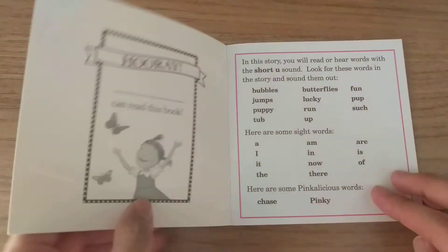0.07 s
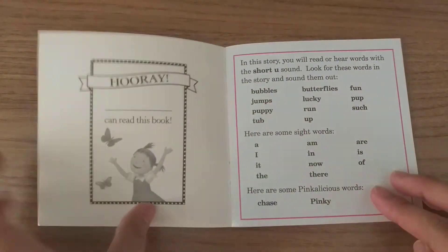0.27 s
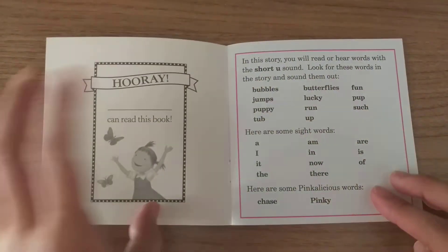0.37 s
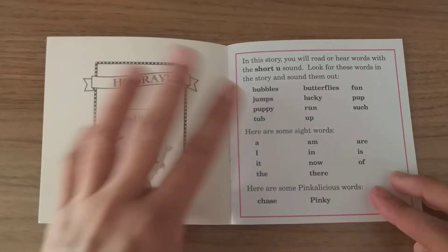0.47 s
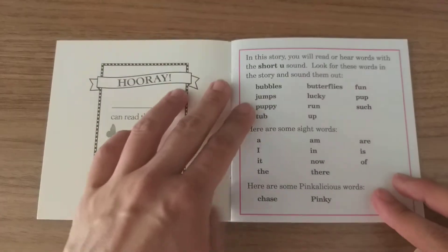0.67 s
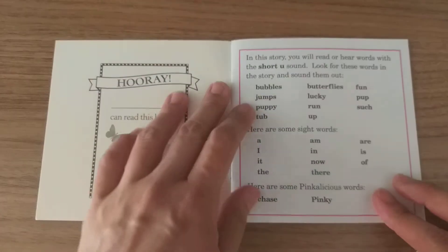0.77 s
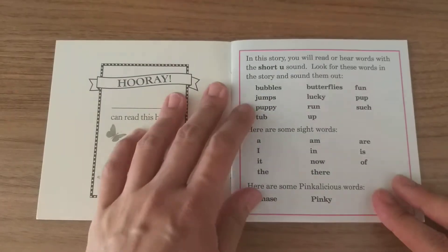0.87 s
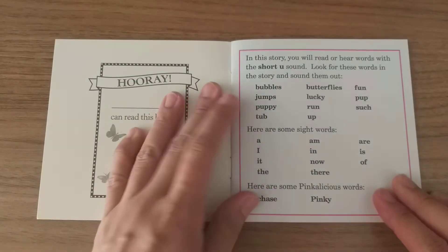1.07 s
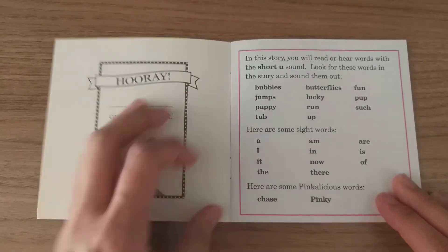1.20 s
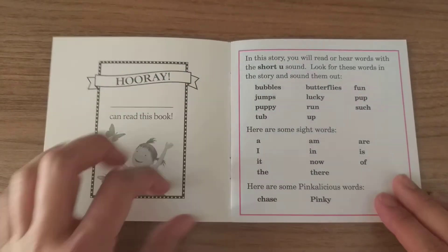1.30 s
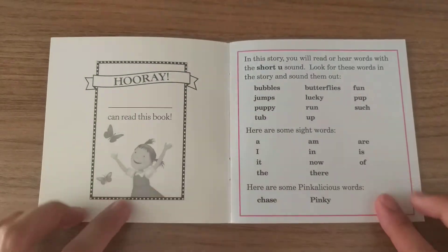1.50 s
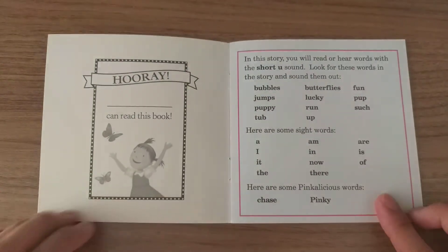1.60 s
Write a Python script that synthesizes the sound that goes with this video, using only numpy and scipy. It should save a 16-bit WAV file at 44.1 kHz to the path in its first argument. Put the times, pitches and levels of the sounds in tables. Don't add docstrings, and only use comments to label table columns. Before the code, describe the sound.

Close up in a quiet room, a card book cover buckles and snaps flat with a light thud, followed by a short papery rub, a quiet pause, small ticks and fading soft rustles as the hand lifts.

```python
import sys
import numpy as np
from scipy import signal
from scipy.fft import rfft, irfft
from scipy.io import wavfile

SR = 44100
rng = np.random.default_rng(int(sys.argv[2]) if len(sys.argv) > 2 else 0)


def decibels_to_gain(level_db):
    exponent = np.asarray(level_db, float) / 20
    return 10 ** exponent


def waveform_to_disk(signal):
    frames = np.transpose(np.atleast_2d(signal))
    scaled = np.clip(frames, -1, 1) * 32767
    samples = np.round(scaled).astype(np.int16)
    wavfile.write(sys.argv[1], SR, samples)


N = 72765
SPOTS = 3


def rms_one(x):
    return x / np.sqrt(np.mean(x ** 2) + 1e-20)


def at_hz(points, hz):
    point_hz, value = np.array(points).T
    return np.interp(np.log(np.maximum(hz, 1)), np.log(point_hz), value)


def coloured(x, db):
    return irfft(rfft(x) * decibels_to_gain(db), len(x))


def bandpass(x, low_hz, high_hz):
    return signal.sosfilt(signal.butter(2, [low_hz, high_hz], "band", fs=SR, output="sos"), x)


def resonate(x, hz, width_hz):
    r = np.exp(-np.pi * width_hz / SR)
    zeros = (1 - r * r) / 2 * np.array([1, 0, -1])
    return signal.lfilter(zeros, [1, -2 * r * np.cos(2 * np.pi * hz / SR), r * r], x)


def resonate_twice(x, hz, width_hz):
    return resonate(resonate(x, hz, width_hz), hz, width_hz)


def add(out, start_s, x):
    i = int(start_s * SR)
    out[i:i + len(x)] += x[:N - i]


def stroke(full_s, rise_s, hold_s, db):
    rise_db, release_db_per_s = 21.5, 2209.5
    t = np.arange(N) / SR
    swell_db = np.minimum(rise_db * (t - full_s) / rise_s, 0)
    release_db = release_db_per_s * np.maximum(t - full_s - hold_s, 0)
    return decibels_to_gain(db + np.maximum(swell_db - release_db, -120))


def floor():
    # (frequency [Hz], level [dB])
    air_spectrum = [(15, -36.5), (30, -16.5), (55, -18), (102, -3.5), (189, -9.5), (228, -14.5), (812, -17),
                    (5090, -34), (12700, -37), (15800, -33.5)]
    # (frequency [Hz], width [Hz], level [dB rms])
    hum = [(100.5, 4, -81.5), (129.6, 49, -84), (203.7, 4.8, -84.5), (244, 9.5, -81.5)]
    air_db = -69
    air = rms_one(coloured(rng.standard_normal(N), at_hz(air_spectrum, np.fft.rfftfreq(N, 1 / SR))))
    out = decibels_to_gain(air_db) * air
    for hz, width_hz, db in hum:
        white = rng.standard_normal(2 * N)
        out += decibels_to_gain(db) * rms_one(resonate(white, hz, width_hz)[N:])
    return out


def earlier():
    # (frequency [Hz], width [Hz], level [dB])
    rustle_modes = [(2200, 350, 7), (4050, 500, 3.3), (8560, 1300, 4.5), (12530, 800, -6)]
    start_db, t60_s = -63.5, 0.34
    white = rng.standard_normal(N)
    rustle = sum(decibels_to_gain(db) * resonate(white, hz, width_hz) for hz, width_hz, db in rustle_modes)
    return decibels_to_gain(start_db - 60 * np.arange(N) / SR / t60_s) * rms_one(rustle)


def fibre_grains():
    grains_per_s, spread_db = 6000, 1.2
    size_db = spread_db * np.minimum(rng.exponential(1, N), 5)
    sizes = decibels_to_gain(size_db) * rng.choice([-1, 1], N)
    catches = rms_one(sizes * (rng.random(N) < grains_per_s / SR))
    return catches + .5 * rng.standard_normal(N)


def rubbing(grains):
    # (full at [s], rise [s], hold [s], level [dB rms], tilt [dB per octave])
    strokes = [(0.176, 0.092, .01, -69.5, 2), (0.194, 0.015, 0.0029, -47.5, -7),
               (0.219, 0.014, 0.0085, -44, -8), (0.242, 0.0088, 0.022, -52.5, -5.5),
               (0.545, 0.014, 0.02, -63.5, -4.5), (0.652, 0.021, 0.0082, -63, 0.5),
               (0.678, 0.039, 0.013, -44, -3.5), (0.702, .015, 0.011, -45.5, -0.5),
               (0.186, 0.0097, 0.005, -53, -3.5), (0.697, .004, 0.0017, -43.5, -4.3),
               (1.092, 0.0099, 0.0022, -64, 7.5), (1.131, 0.065, 0.0154, -64, 3),
               (1.164, 0.02, 0.00845, -52.5, 0), (1.193, 0.029, 0.011, -56.5, 1),
               (1.212, 0.039, 0.039, -58, -0.5), (1.259, 0.014, 0.02, -58, -2),
               (1.289, .02, .03, -62, -1.5), (1.328, 0.14, 0.08, -65.5, 3), (1.43, .04, .127, -63, 3.5),
               (1.61, 0.02, 0.017, -58, 8.5)]
    # (frequency [Hz], level [dB per Hz])
    rub = [(1290, -32.5), (2200, -13), (2490, -17), (4050, -7.5), (5680, -7.5), (6920, -4), (7580, -5.5),
           (9630, -3.5), (15800, -14)]
    # (frequency [Hz], width [Hz], level [dB])
    page_modes = [(3200, 400, 2.5), (3850, 300, 3), (4250, 300, 3), (5050, 250, 4.5), (7800, 500, 3),
                  (9400, 700, -1.5), (11500, 500, -1.5), (12700, 300, 1.5)]
    hz = np.fft.rfftfreq(N, 1 / SR)
    page = grains + sum(decibels_to_gain(db) * resonate(grains, f, w) for f, w, db in page_modes)
    rub_db = at_hz(rub, hz)
    octaves = np.log2(np.maximum(hz, rub[0][0]) / 5000)
    paper = np.zeros(N)
    for *movement, tilt in strokes:
        paper += stroke(*movement) * rms_one(coloured(page, rub_db + tilt * octaves))
    return paper


def chafes():
    # (full at [s], rise [s], hold [s], level [dB rms], pitch [Hz])
    chafe_rows = [(.187, .006, .003, -47, 3400), (.188, 0.007, .004, -56, 1800),
                  (.227, .003, .004, -46, 4700), (.613, .004, .003, -68, 2000), (.76, .02, .025, -63, 4100),
                  (.191, 0.0035, 0.00091, -51, 4540), (.207, 0.0033, .002, -50, 1690),
                  (.221, .012, 0.012, -47.5, 4540), (.221, .005, 0.0034, -59, 8500),
                  (.25, 0.0091, 0.011, -58, 4800), (.262, .008, 0.0036, -52, 1500),
                  (.64, 0.029, 0.034, -64, 3700), (.68, 0.017, 0.016, -50, 7600),
                  (.68, 0.012, 0.0057, -47.5, 4050), (.697, .01, 0.008, -42.5, 3840),
                  (.70, 0.022, .01, -46, 5110), (.72, 0.0093, .025, -65, 5200),
                  (1.266, .003, 0.0028, -49.5, 4720), (1.268, 0.0062, 0.0055, -54, 3030),
                  (1.283, .01, 0.0086, -59, 2120), (1.285, .01, 0.0065, -61, 2970),
                  (1.35, 0.043, 0.037, -67.5, 4850), (1.48, 0.046, .03, -70, 4720),
                  (1.2525, .001, .003, -53.5, 2000), (.704, .004, 0.0034, -46, 4160)]
    q = 7
    white = rng.standard_normal((2, N))
    out = np.zeros(N)
    for k, (*movement, hz) in enumerate(chafe_rows):
        out += stroke(*movement) * rms_one(resonate_twice(white[k % 2], hz, hz / q))
    return out


def snaps():
    # (time [s], peak [dB], lowest [Hz], highest [Hz], fray [s])
    snap_rows = [(0.2006, -29.5, 2472, 5460, 0.00025), (0.2376, -36, 2440, 5550, 0.0011),
                 (.27193, -15, 3600, 7500, .0001), (.2723, -15, 3500, 6000, .0001),
                 (.2732, -7.5, 3800, 12000, .00006), (.2734, -17, 7800, 10000, .0002),
                 (.272, -24.5, 9000, 16600, 0.00091), (0.276, -28, 2830, 13000, 0.00026),
                 (0.2744, -21, 3000, 4800, 0.00034), (0.2753, -28, 2500, 5000, .0005),
                 (.2784, -36, 5500, 9500, .0006), (0.2847, -35.5, 4000, 9400, .002),
                 (0.71, -48.5, 4000, 5900, 0.031), (.5700, -61.5, 3500, 12400, 0.021),
                 (.7480, -56, 3860, 14300, 0.002), (0.294, -43, 4090, 7120, .002),
                 (.5350, -52, 4970, 15000, 0.0025), (0.59, -54, 1610, 4500, 0.0015),
                 (0.8828, -50, 3800, 15000, 0.00043), (1.0415, -61, 1580, 4800, 0.0034),
                 (1.0872, -55.5, 1615, 5520, 0.0028), (1.1227, -52, 3400, 10400, 0.013),
                 (1.2526, -39, 3600, 5600, 0.00125), (1.2546, -37, 3550, 5200, 0.0008),
                 (1.2529, -46, 7000, 9800, .003), (1.258, -39, 4300, 5300, 0.0033),
                 (1.266, -43.5, 2200, 5700, 0.049), (1.2797, -48, 1800, 5500, 0.00086),
                 (.1890, -38, 204, 1550, 0.016), (0.229, -44.5, 200, 1010, 0.032),
                 (.2740, -37, 250, 1300, 0.014), (0.625, -64, 2440, 5070, 0.062)]
    click_s = .008
    out, t = np.zeros((SPOTS, N)), np.arange(8000) / SR
    for k, (start_s, db, low_hz, high_hz, fray_s) in enumerate(snap_rows):
        burst = rng.standard_normal(8000) * np.exp(-t / fray_s)
        burst[0] += np.sqrt(click_s / fray_s)
        x = bandpass(burst, low_hz, min(high_hz, 19000))
        add(out[k % SPOTS], start_s, decibels_to_gain(db) * x / np.abs(x).max())
    return out


def rings(rows, soft_cycles):
    out, t = np.zeros(N), np.arange(SR // 5) / SR
    for start_s, db, hz, t60_s in rows:
        tone = -np.sin(2 * np.pi * hz * t) - 0.29 * np.sin(2 * np.pi * hz * 1.3 * t)
        swell = 1 - np.exp(-t * hz / soft_cycles)
        add(out, start_s, decibels_to_gain(db - 60 * t / t60_s) * swell * tone)
    return out


def thuds():
    # (time [s], peak [dB], pitch [Hz], t60 [s])
    thud_rows = [
        (.19, -45, 100, 0.2),
        (0.2, -49.5, 274, 0.062),
        (.276, -51, 273.2, 0.11),
        (.29, -55, 136.6, 0.23),
    ]
    return rings(thud_rows, soft_cycles=0.51)


def knocks():
    # (time [s], peak [dB], pitch [Hz], t60 [s])
    knock_rows = [(.1935, -30.5, 1707, 0.025), (.2005, -21.5, 1275, 0.01), (.2018, -31, 1930, 0.023),
                  (.2062, -37.5, 1400, 0.022), (.1918, -34.5, 1180, .02), (.2225, -32.5, 1866, 0.03),
                  (.2292, -31.5, 1018, 0.028), (.2376, -24, 1150, 0.016), (.2292, -30, 1300, .008),
                  (.2738, -19, 1314, 0.012), (.2765, -22.5, 1204, 0.013), (.2752, -25, 2140, 0.0089),
                  (.2812, -12, 1550, 0.006), (.2826, -28, 1850, 0.03), (.2836, -33, 1250, .03),
                  (.2900, -29.5, 1682, 0.016), (.2722, -24.5, 1900, 0.03), (.3085, -30, 2130, 0.0067),
                  (1.2530, -49.5, 2050, 0.029), (1.2535, -52.5, 1120, 0.016)]
    return np.array([rings(knock_rows[k::SPOTS], soft_cycles=0.35) for k in range(SPOTS)])


def pressing(grains):
    # (full at [s], rise [s], hold [s], level [dB rms])
    presses = [(.222, .006, .006, -43), (1.04, .006, .05, -75), (1.2, .04, .04, -78),
               (1.255, .02, .045, -63), (1.33, .03, .06, -73), (.548, .01, .048, -70),
               (.635, .03, .032, -67), (.675, .03, .038, -61), (1.47, .04, .087, -73), (.79, .06, .07, -80)]
    table_hz, table_width_hz = 1900, 440
    wood = rms_one(resonate_twice(grains, table_hz, table_width_hz))
    return wood * sum(stroke(*row) for row in presses)


def squeak():
    # (time [s], pitch [Hz], level [dB])
    squeak_path = [
        (.9, 12500, -100),
        (.93, 12550, -90),
        (.975, 12650, -84),
        (1.015, 12750, -85),
        (1.045, 12800, -90),
        (1.06, 12800, -105),
    ]
    s, hz, db = np.transpose(squeak_path)
    t = np.arange(N) / SR
    flutter = 1 + .5 * rms_one(resonate(rng.standard_normal(N), 40, 60))
    tone = np.sin(2 * np.pi * np.cumsum(np.interp(t, s, hz)) / SR)
    return np.sqrt(2) * decibels_to_gain(np.interp(t, s, db, left=-200, right=-200)) * flutter * tone


def hollow():
    # (time [s], pitch [Hz], level [dB rms])
    hollow_path = [
        (1.3, 3900, -80),
        (1.365, 3600, -66),
        (1.4, 3500, -70),
        (1.425, 3450, -71),
        (1.46, 3350, -75),
        (1.495, 3300, -72),
        (1.52, 3250, -78),
        (1.56, 3200, -90),
    ]
    width_hz = 140
    s, hz, db = np.transpose(hollow_path)
    t = np.arange(N) / SR
    slow = signal.lfilter(*signal.butter(2, width_hz, fs=SR), rng.standard_normal((2, N)))
    phase = 2 * np.pi * np.cumsum(np.interp(t, s, hz)) / SR
    carried = slow[0] * np.sin(phase) + slow[1] * np.cos(phase)
    return decibels_to_gain(np.interp(t, s, db, left=-200, right=-200)) * rms_one(carried)


def room(x):
    # (frequency [Hz], t60 [s])
    room_t60 = [(200, 0.23), (1400, 0.41), (4000, 0.29), (10000, 0.33), (16000, 0.27)]
    # (frequency [Hz], level [dB])
    room_colour = [(300, 10.5), (1200, -1.5), (2000, 0), (3000, 0.5), (4500, 1.15), (7000, -0.5),
                   (10000, -3.5), (14000, 0)]
    room_db, gap_s, low_hz = -12.5, 0.003, 516
    t = np.arange(SR // 2) / SR
    band_hz = 125 * 2 ** np.arange(0, 7.3, .5)
    white = rng.standard_normal((2, len(t)))
    tail = np.zeros(len(t))
    for k, (a, b) in enumerate(zip(band_hz, band_hz[1:])):
        t60_s = at_hz(room_t60, np.sqrt(a * b))
        tail += bandpass(white[k % 2], a, b) * decibels_to_gain(-60 * t / t60_s)
    tail *= np.clip(t / gap_s, 0, 1) ** 2
    tail = signal.lfilter(*signal.butter(1, low_hz, "high", fs=SR), tail)
    tail /= np.sqrt(np.sum(tail ** 2))
    tail = coloured(tail, at_hz(room_colour, np.fft.rfftfreq(len(t), 1 / SR)))
    return decibels_to_gain(room_db) * signal.fftconvolve(x, tail)[:N]


def scene():
    mic_low_hz = 74.5
    grains = fibre_grains()
    spots = snaps() + knocks()
    spots[0] += rubbing(grains) + chafes() + thuds() + hollow()
    direct = spots.sum(axis=0) + pressing(grains)
    near = signal.sosfilt(signal.butter(2, mic_low_hz, "high", fs=SR, output="sos"), direct)
    reverb = sum(room(x) for x in spots)
    return np.tile(near + reverb + squeak() + earlier() + floor(), (2, 1))


def band_limit(x):
    return signal.sosfilt(signal.butter(12, 17040, fs=SR, output="sos"), x)


def record(dry):
    # (frequency [Hz], width [Hz], level [dB down; sign = louder side])
    ports = [(1900, 820, -11), (10100, 1300, 11), (4800, 2000, 24)]
    side_leak, hiss_db = .015, -81.5
    cutoff_hz, top_loss_db = 15900, 34
    side = side_leak * dry[0] + decibels_to_gain(hiss_db) * rng.standard_normal(N)
    for hz, width_hz, db in ports:
        side -= np.sign(db) * decibels_to_gain(-abs(db)) * resonate_twice(dry[0], hz, width_hz)
    top_db = -top_loss_db * (np.fft.rfftfreq(N, 1 / SR) > cutoff_hz)
    left, right = coloured(dry[0] + side, top_db), coloured(dry[1] - side, top_db)
    return band_limit(np.array([left, right]))


dry = scene()
out = record(dry)
waveform_to_disk(out)
```